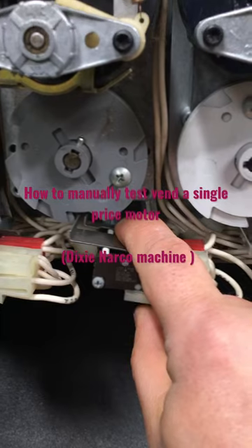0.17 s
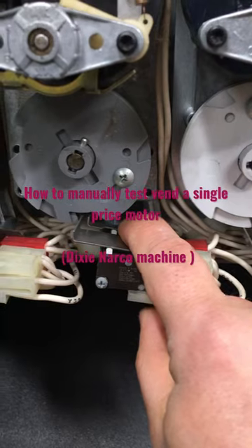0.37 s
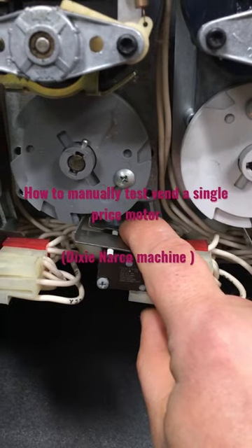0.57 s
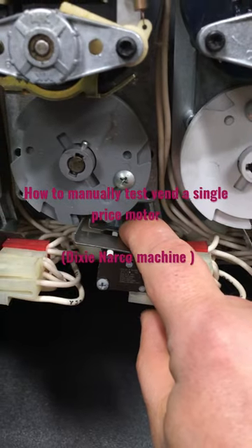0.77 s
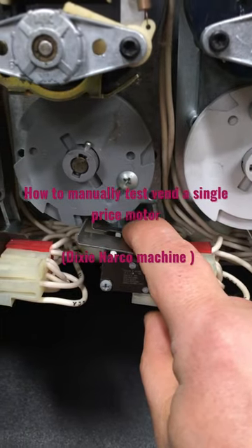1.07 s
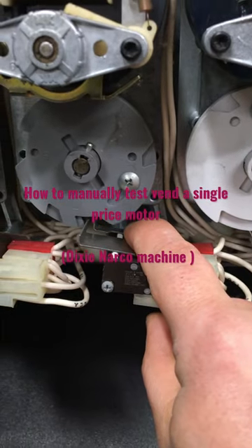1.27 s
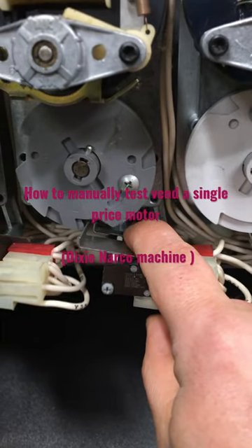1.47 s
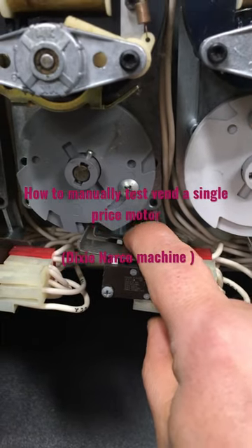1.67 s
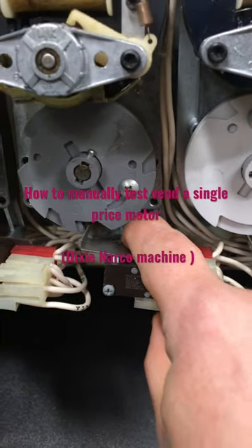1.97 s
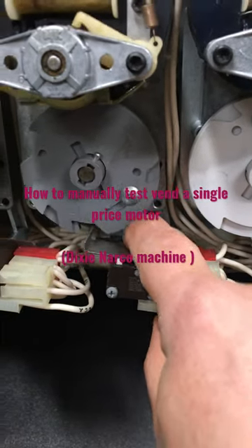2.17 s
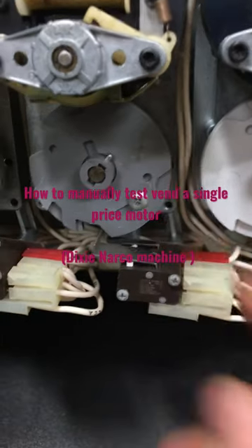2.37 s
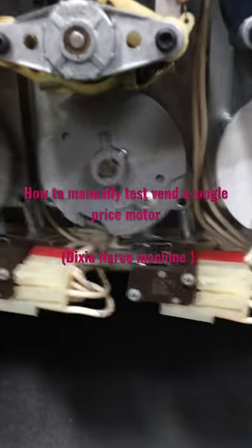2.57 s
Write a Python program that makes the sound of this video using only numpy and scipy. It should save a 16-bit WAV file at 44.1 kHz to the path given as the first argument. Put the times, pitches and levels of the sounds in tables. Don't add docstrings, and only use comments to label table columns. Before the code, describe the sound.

Hard metallic switch snap over a steady cooling hum, followed by the gritty whir of a small gearmotor.

```python
import sys
import numpy as np
from scipy import signal
from scipy.fft import rfft, irfft
from scipy.io import wavfile

SR = 44100
rng = np.random.default_rng(int(sys.argv[2]) if len(sys.argv) > 2 else 0)


def file_out(sig):
    cols = np.atleast_2d(sig).T
    lim = np.clip(cols, -1, 1)
    pcm = np.round(lim * 32767).astype(np.int16)
    wavfile.write(sys.argv[1], SR, pcm)


def ratio(d):
    e = np.asarray(d, float) / 20
    return 10 ** e


N = 120393


def rms_one(x):
    return x / np.sqrt(np.mean(x ** 2) + 1e-20)


def drift(rate_hz):
    step, settle = 40, 2000
    r = np.exp(-2 * np.pi * rate_hz * step / SR)
    noise = rng.standard_normal(N // step + settle + 2)
    slow = signal.lfilter([1], [1, -2 * r, r * r], noise)[settle:]
    return np.interp(np.arange(N) / step, np.arange(len(slow)), rms_one(slow - slow.mean()))


def colour(white, spectrum):
    hz, db = np.transpose(spectrum)
    bin_hz = np.maximum(np.fft.rfftfreq(len(white), 1 / SR), 1)
    gain = ratio(np.interp(np.log(bin_hz), np.log(hz), db))
    return rms_one(irfft(rfft(white) * gain, len(white)))


def resonance(x, hz, width_hz):
    r = np.exp(-np.pi * width_hz / SR)
    zeros = np.array([1, 0, -1]) * (1 - r * r) / 2
    return signal.lfilter(zeros, [1, -2 * r * np.cos(2 * np.pi * hz / SR), r * r], x)


def ring(x, hz, t60_s):
    r = ratio(-60 / (t60_s * SR))
    w = 2 * np.pi * hz / SR
    return signal.lfilter([0, np.sin(w)], [1, -2 * r * np.cos(w), r * r], x)


def butter2(x, hz, kind="low"):
    return signal.sosfilt(signal.butter(2, hz, kind, fs=SR, output="sos"), x)


def wavering_sine(hz, level_db, waver_db, rate_hz):
    t = np.arange(N) / SR
    return ratio(level_db + waver_db * drift(rate_hz)) * np.sin(2 * np.pi * (hz * t + rng.random()))


def unit_tones():
    # pitch_hz, level_db (rms)
    unit_tone_table = [(120.0, -25), (703.6, -36.5), (730.1, -39), (783.2, -52)]
    return np.sqrt(2) * sum(wavering_sine(hz, db, 0.5, 5.8) for hz, db in unit_tone_table)


def cabinet_booms():
    # centre_hz, width_hz, level_db (rms)
    cabinet_modes = [(96.8, 12.1, -26.5), (76.4, 17, -62), (192.6, 69, -40), (243, 27, -42.5),
                     (263.7, 9.2, -39), (395, 68, -43), (563.3, 72, -42.5), (616.4, 22, -58.5),
                     (933, 58, -47.5), (1170, 74, -55.5)]
    out = np.zeros(N)
    for hz, width_hz, db in cabinet_modes:
        noise = rng.standard_normal(N + SR)
        once = resonance(noise, hz, 1.35 * width_hz)
        out += ratio(db) * rms_one(resonance(once, hz, 1.35 * width_hz)[SR:])
    return out


def air_noise():
    # freq_hz, density_db (per Hz)
    air_spectrum = [(30, -41), (100, -6.5), (145, -13), (600, -16.5), (1500, -26.5), (4500, -41),
                    (5200, -45.5), (16000, -68.5)]
    # centre_hz, width_hz, level_db (rms)
    hiss_humps = [(2350, 300, -63), (3850, 340, -68.5), (5970, 1100, -68.5), (9000, 1700, -76.5),
                  (12500, 4000, -84)]
    air = ratio(-35.5 + 0.5 * drift(7.1)) * colour(rng.standard_normal(N), air_spectrum)
    for hz, width_hz, db in hiss_humps:
        air += ratio(db) * rms_one(resonance(rng.standard_normal(N), hz, width_hz))
    return air


def cooling_unit():
    return unit_tones() + cabinet_booms() + air_noise()


def metal_rattles(events):
    # pitch_hz, level_db, t60_s
    metal_modes = [(1808, -0.5, 0.037), (2840, -17, 0.22), (3740, 1, 0.044), (5640, -5, 0.018),
                   (7670, 0, 0.023), (8770, -5.5, 0.019), (9130, 3.5, 0.012), (9570, -10, 0.028),
                   (11100, -4.5, 0.012), (12060, -5.5, 0.017), (12430, 2.5, 0.011), (13300, -1.5, 0.017),
                   (13600, -24, 0.02), (14900, -3, 0.023)]
    crack_db, ring_db, t60_scale, attack_s = 5.5, -5, 0.49, 0.00046
    out = np.zeros(N + SR)
    span = np.arange(SR // 12) / SR
    for start_s, level_db, length_s, bright_db_oct in events:
        envelope = np.exp(-span / length_s) * np.minimum(span / attack_s, 1)
        rattle = rng.choice([-1, 1], len(span)) * envelope
        edge_hz = np.clip(3500 * 2 ** (bright_db_oct / 2), 500, 15000)
        sound = ratio(crack_db) * butter2(rattle, edge_hz, "high")
        for hz, mode_db, t60_s in metal_modes:
            gain = ratio(ring_db + mode_db + bright_db_oct * np.log2(hz / 6000)) * rattle.std()
            sound = sound + gain * rms_one(ring(rattle, hz, t60_scale * t60_s))
        start = int(start_s * SR)
        out[start:start + len(span)] += ratio(level_db) * sound
    return out[:N]


def arm_pings():
    # start_s, pitch_hz, level_db, t60_s
    ping_events = [(2.2275, 4730, -25, .02), (2.228, 14100, -24, .012), (2.299, 3380, -28, .025),
                   (2.299, 13000, -32, .012), (2.209, 6300, -32, .015), (2.524, 8600, -28, .02)]
    out = np.zeros(N + SR)
    span = np.arange(SR // 12) / SR
    click = 1.0 * (span == 0)
    for start_s, hz, level_db, t60_s in ping_events:
        start = int(start_s * SR)
        out[start:start + len(span)] += ratio(level_db) * ring(click, hz, t60_s) * np.minimum(span / 0.0006, 1)
    return out[:N]


def switch_arms():
    # start_s, level_db, length_s, bright_db_oct
    arm_drops = [
        (2.224, -50, 0.0022, 0.1),
        (2.2287, -30.5, 0.0036, 4),
        (2.297, -36, 0.002, 6),
        (2.515, -34, 0.0038, 5),
        (2.521, -32, .004, -5),
    ]
    return metal_rattles(arm_drops) + arm_pings()


def lever_snap():
    # start_s, level_db, length_s, bright_db_oct
    snap_contacts = [
        (1.886, -55, 0.0026, -0.5),
        (1.897, -58, .003, 0),
        (1.905, -35, 0.0043, -2),
        (1.9072, -13, 0.0018, 1),
        (1.9095, -9, 0.0024, 0.5),
        (1.9127, -16.5, 0.0012, 2),
        (1.9155, -28, .009, -6.5),
    ]
    return metal_rattles(snap_contacts)


def tooth_contacts():
    # start_s, rise_db, length_s
    knock_events = [(1.950, 2, .004), (2.015, -1, .004), (2.116, -1, 0.0036), (2.157, 6, .003),
                    (2.21, 6.5, 0.0046), (2.329, 8, 0.0038), (2.349, 6, .003), (2.382, 6, 0.0054),
                    (2.417, 0, .004), (2.504, 2.5, 0.013), (2.632, 6, .006), (2.648, 4.5, 0.0031),
                    (2.67, 7, .003), (2.708, -1, .006)]
    mains_pulse_hz, pulse_depth_db, pulse_share = 120.0, 5.5, 0.25
    hits_per_s, size_spread_db, clump_db = 9000, 3.0, 1.5
    t = np.arange(N) / SR
    swell_db = pulse_depth_db * np.exp(-(mains_pulse_hz * t % 1) / pulse_share) + clump_db * drift(36.0)
    for start_s, rise_db, length_s in knock_events:
        swell_db += rise_db * np.exp(-np.maximum(t - start_s, 0) / length_s) * (t >= start_s)
    sizes = ratio(size_spread_db * np.minimum(rng.exponential(1, (2, N)), 5))
    sizes = sizes * rng.choice([-1, 1], (2, N))
    hits = rng.random((2, N)) < hits_per_s / SR
    return rms_one(sizes * hits * ratio(swell_db))


def gear_whir():
    # centre_hz, width_hz, level_db
    frame_modes = [(1260, 117, -9), (2245, 210, -4.5), (2816, 136, 2.5), (4230, 260, -7),
                   (5660, 130, -12.5), (6300, 420, -8.5), (7400, 100, -12.5), (8670, 190, -16.5),
                   (9720, 410, -11.5), (11470, 250, -12), (12670, 250, -12.5), (13000, 260, -12.5)]
    # freq_hz, density_db (per Hz)
    whir_spectrum = [(600, -17.5), (1000, -6.5), (2500, -15.5), (5000, -12.5), (7000, -15), (10400, -21),
                     (12500, -18), (16000, -23)]
    near, far = tooth_contacts()
    frame = np.zeros(N)
    for k, (hz, width_hz, db) in enumerate(frame_modes):
        flicker = ratio(db + 1.5 * drift(5.6))
        frame += (-1) ** k * flicker * resonance(near, hz, width_hz)
    return ratio(-1) * rms_one(frame) + ratio(-1.5) * colour(far, whir_spectrum)


def gear_mesh():
    # pitch_hz, level_db
    mesh_tones = [(958, -68), (1065, -68), (1143, -70), (1240, -55), (1303, -49.5), (1359, -70),
                  (2148, -53.5), (2246, -65), (2403, -57), (2878, -49.5)]
    return sum(wavering_sine(hz, db, 5.5, 3.6) for hz, db in mesh_tones)


def motor():
    # time_s, level_db, treble_db (extra)
    load_curve = [(1.92, -31, -7), (1.945, -40, 0), (1.96, -37, 1), (2.07, -34.5, -1), (2.2, -36, .1),
                  (2.236, -38, -4.5), (2.25, -42, -6), (2.292, -46, -4.1), (2.32, -41, 0), (2.333, -35, 2),
                  (2.4, -34, -2), (2.44, -35, 2), (2.5, -38.5, 1.5), (2.53, -33, .1), (2.56, -36.5, 1.5),
                  (2.62, -37.5, .1), (2.66, -34.5, -6), (2.73, -36, 4)]
    start_s, spin_up_s, low_follows = 1.915, 0.0067, 0.68
    t = np.arange(N) / SR
    time_s, load_db, extra_db = np.transpose(load_curve)
    level_db = np.interp(t, time_s, load_db)
    treble_db = np.interp(t, time_s, extra_db)
    whir = gear_whir()
    low = butter2(whir, 3160)
    loudest_db = level_db.max()
    low_db = loudest_db + low_follows * (level_db - loudest_db)
    whir = ratio(low_db) * low + ratio(level_db) * (whir - low)
    whir = whir + (ratio(treble_db) - 1) * butter2(whir, 7500, "high")
    running = np.clip((t - start_s) / spin_up_s, 0, 1)
    return running * (ratio(1.5) * whir + gear_mesh())


def scene():
    return (cooling_unit() + switch_arms() + lever_snap() + motor())[None, :]


def top_cut(x):
    return signal.sosfilt(signal.butter(12, 16530, fs=SR, output="sos"), x)


def record(dry):
    # centre_hz, width_hz, share removed (0-1)
    reflection_dips = [(2960, 170, .4), (4900, 380, 0.41), (7870, 400, 0.25), (10400, 390, 0.4)]
    open_s, fade_in_s, cutoff_hz, limit = 0.033, 0.0057, 15700, 0.82
    for hz, width_hz, share in reflection_dips:
        dry = dry - share * resonance(dry, hz, width_hz)
    opening = np.clip((np.arange(N) / SR - open_s) / fade_in_s, 0, 1)
    lowpass = signal.ellip(10, 0.5, 60, cutoff_hz, fs=SR, output="sos")
    cut = signal.sosfilt(lowpass, dry * opening)
    mix = limit * np.tanh(cut / limit)
    return top_cut(mix)


dry = scene()
out = record(dry)
file_out(out)
```